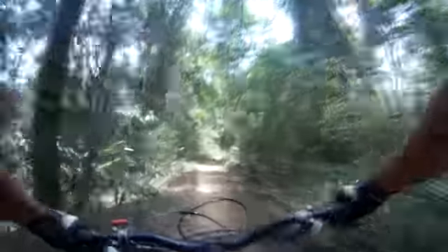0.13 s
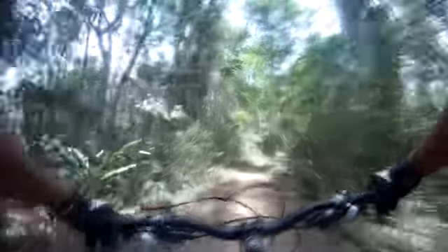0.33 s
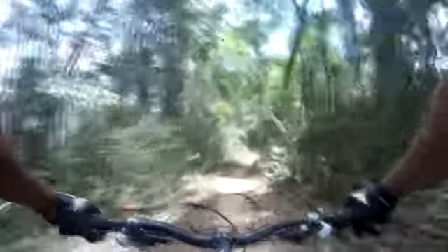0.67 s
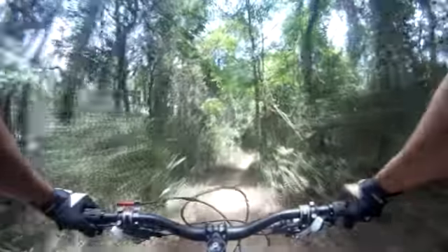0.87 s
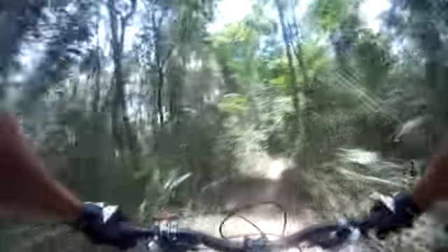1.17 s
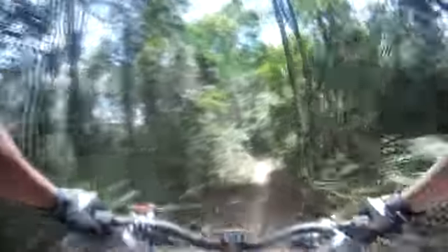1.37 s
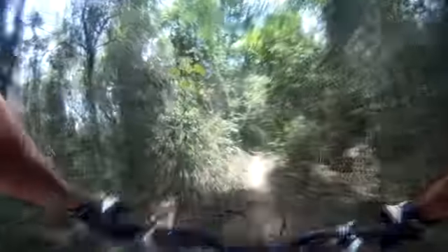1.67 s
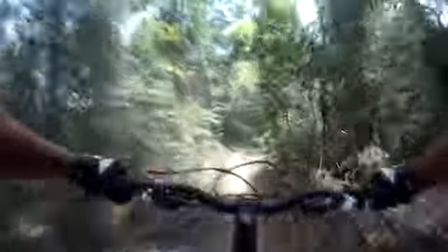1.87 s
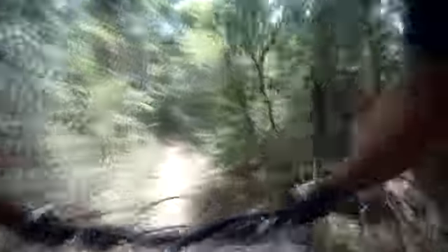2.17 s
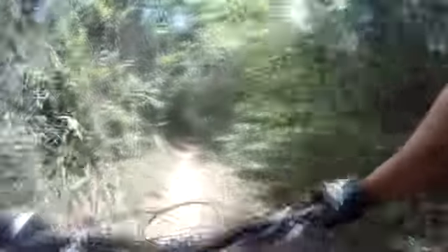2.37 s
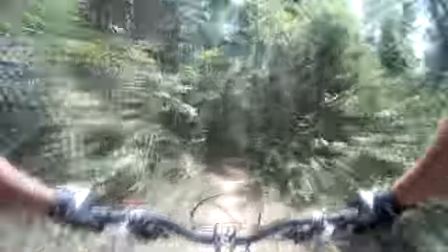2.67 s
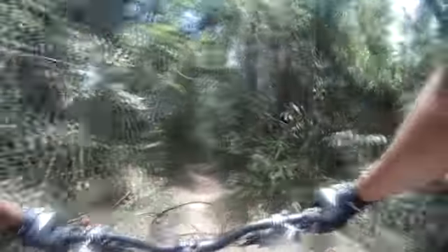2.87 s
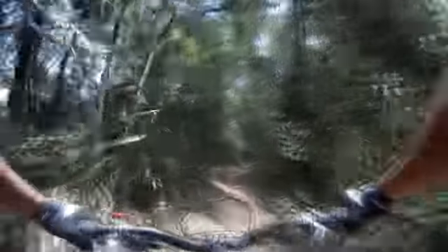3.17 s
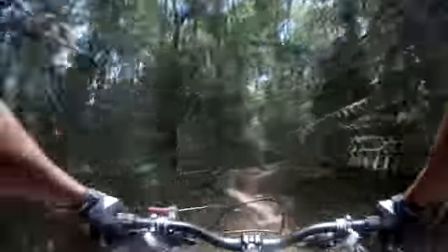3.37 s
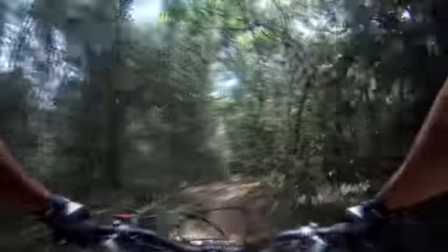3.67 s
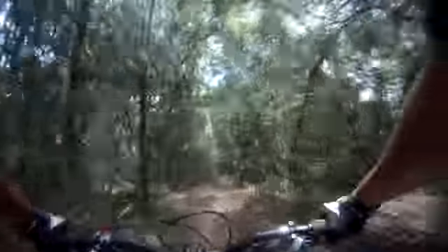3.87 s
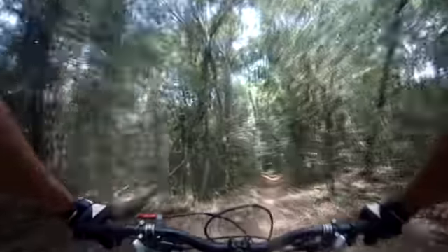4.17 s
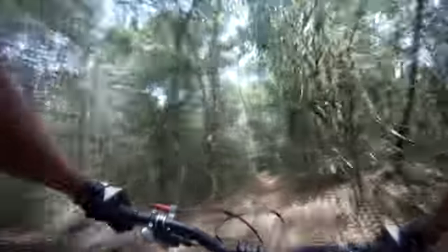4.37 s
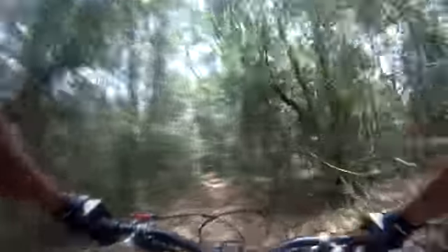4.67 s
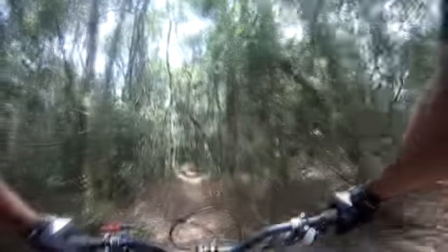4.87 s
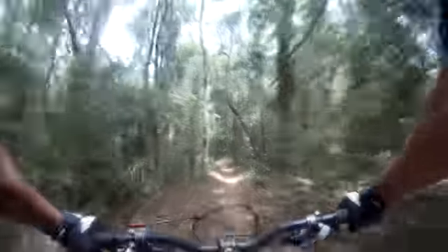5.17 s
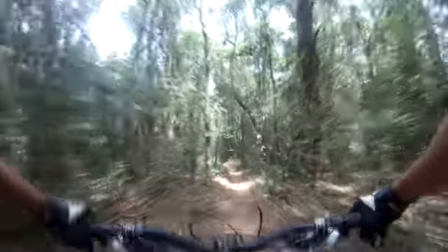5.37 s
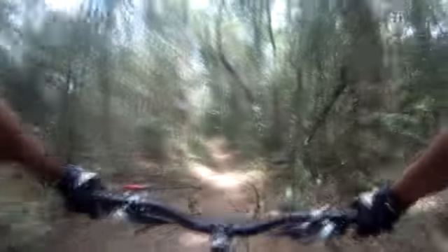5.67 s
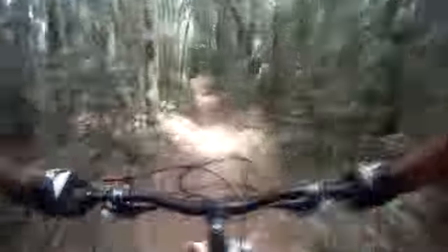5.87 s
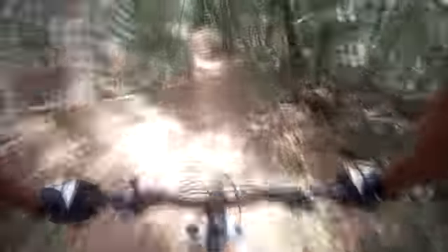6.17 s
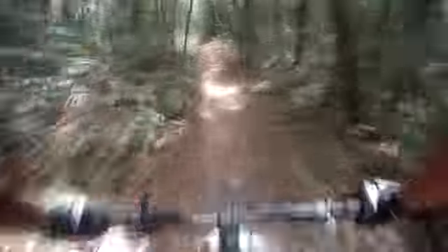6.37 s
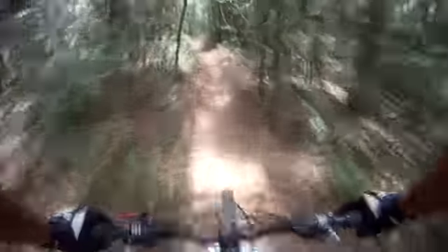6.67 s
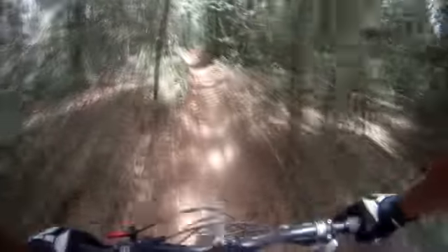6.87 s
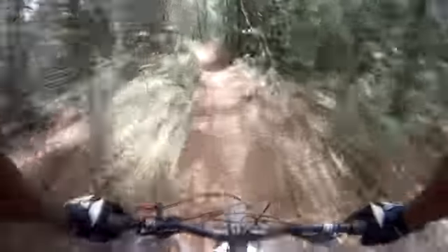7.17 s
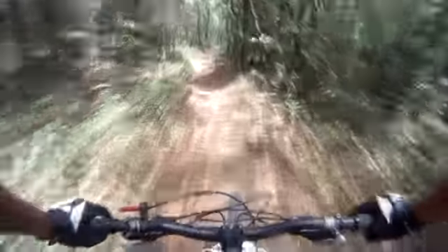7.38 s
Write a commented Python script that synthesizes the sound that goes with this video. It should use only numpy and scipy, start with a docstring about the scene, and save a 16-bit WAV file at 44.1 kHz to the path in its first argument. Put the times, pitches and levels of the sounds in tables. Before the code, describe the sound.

A mountain bike rolls fast along a dirt forest trail, heard close from the rider's camera. The tyres make a quiet crunch and rumble, with a soft low thump about three times a second. The chain and cables rattle in irregular bursts, and several loud, sharp plastic knocks come from the camera case on hard bumps. Near the end the ground gets rougher, with denser rattling and a low thud, before it eases.

```python
"""Tyres crunch and rumble as a mountain bike rolls fast down a dirt trail, heard from the rider's camera.
Friction on dirt and impacts on gravel make the crunch; uneven ground forces the frame to shake.
The chain and cables rattle, a soft thump returns with each wheel turn, and stones are scuffed aside.
Hard bumps ring the modes of the camera's plastic case, and the wheels thud into dips.
The camera's sample-and-hold mirrors the spectrum upward, which adds a glassy top."""
import sys
import numpy as np
from scipy import signal
from scipy.fft import rfft, irfft
from scipy.io import wavfile
from scipy.ndimage import uniform_filter1d

SR = 44100
rng = np.random.default_rng(int(sys.argv[2]) if len(sys.argv) > 2 else 0)


def unload_audio(sound):
    """Save the sound as a 16-bit wav file, at the path given as the first command line argument."""
    columns = np.transpose(np.atleast_2d(sound))
    # keep every value between -1 and 1, then stretch to whole-number steps
    steps = np.round(np.clip(columns, -1, 1) * 32767)
    wavfile.write(sys.argv[1], SR, steps.astype(np.int16))


N = 331632
TIME = np.arange(N) / SR


def undb(db):
    """Decibels to amplitude ratio."""
    return 10 ** (np.asarray(db) / 20)


def unit(x):
    """Normalisation to rms 1."""
    return x / np.sqrt(np.mean(x ** 2))


def peak(x, db):
    """Normalisation to a peak level."""
    return x * undb(db) / np.abs(x).max()


def add(out, start_s, x):
    """Superposition: x joins out from start_s on."""
    i = max(int(start_s * SR), 0)
    out[i:i + len(x)] += x[:N - i]


def curve(rows):
    """Linear interpolation between (time_s, value) rows."""
    return np.interp(TIME, *np.transpose(rows))


def noise_band(size, lo_hz, hi_hz, order=2):
    """Band-limited Gaussian noise."""
    sos = signal.butter(order, [lo_hz, hi_hz], "band", fs=SR, output="sos")
    return signal.sosfilt(sos, rng.standard_normal(size))


def colour(x, spectrum):
    """Spectral shaping by (frequency_hz, level_db) points, with steep skirts outside them; rms 1."""
    hz, db = np.transpose(spectrum)
    f = np.maximum(np.fft.rfftfreq(N, 1 / SR), 1)
    skirts = 1 / np.sqrt((1 + (hz[0] / f) ** 8) * (1 + (f / hz[-1]) ** 8))
    gain = undb(np.interp(np.log(f), np.log(hz), db))
    return unit(irfft(rfft(x) * skirts * gain, N))


def drift(rate_hz):
    """Random modulation: straight glides between chance values; rms 1."""
    hold = int(SR / rate_hz)
    steps = np.repeat(rng.standard_normal(N // hold + 1), hold)
    return unit(uniform_filter1d(steps, hold)[:N])


def grains(per_second, spread_db):
    """Poisson impacts: many small, a few large; rms 1."""
    hits = rng.random(N) < per_second / SR
    signs = rng.choice([-1, 1], N)
    strength_db = spread_db * np.minimum(rng.exponential(size=N), 4)
    return unit(hits * signs * undb(strength_db))


def ring(modes, signs, detune, scatter_db, size=2048):
    """Free vibration: a sum of damped modes, tuned and weighted a little differently at each blow."""
    hz, db, t60_s = np.transpose(modes)[:, :, None]
    shift, weight = rng.standard_normal((2, len(modes), 1))
    t = np.arange(size) / SR
    decay = np.exp(-np.log(1000) * t / t60_s)
    swings = np.sin(2 * np.pi * hz * (1 + detune * shift) * t)
    return signs @ (undb(db - scatter_db * weight) * decay * swings)


# Crunch of the tyres along the trail: time_s, level_db
CRUNCH_LEVEL = [(0.0, -64), (0.9, -62.5), (1.4, -64.5), (2.2, -60.5), (2.41, -57.5), (2.57, -57.5),
                (2.74, -64), (2.91, -64.5), (3.22, -65), (4.86, -63.5), (5.05, -62.5), (5.82, -62.5),
                (6.28, -53), (6.53, -59), (6.83, -61.5), (7.52, -60)]


def rolling_levels():
    """Rolling noise grows with roughness; packed dirt's share grows a quarter as fast on rough ground."""
    crunch_db = curve(CRUNCH_LEVEL) + 2.19
    dirt_db = np.minimum(crunch_db, -61 + .25 * (crunch_db + 61.5))
    return crunch_db, dirt_db


# Spectral density of tyres on dirt: frequency_hz, level_db
DIRT_SPECTRUM = [(150, -31.5), (250, -4.5), (479, -5.5), (755, -6.5), (860, -6), (1060, -3.5), (1150, -5.5),
                 (1520, -7.5), (1650, -8), (2080, -4.5), (2630, -9.5), (2960, -7.5), (3240, -16.5),
                 (3600, -12), (5600, -19), (7280, -58), (12300, -120)]


def dirt_hiss(dirt_db):
    """Friction noise: countless tiny contacts with packed dirt merge into a hiss."""
    hiss = colour(rng.standard_normal(N), DIRT_SPECTRUM)
    return hiss * undb(dirt_db - 0.5 + 0.51 * drift(rate_hz=6.5))


# Spectral density of gravel ringing through frame and case: frequency_hz, level_db
GRAVEL_SPECTRUM = [(320, -47), (550, -17.5), (1060, -2), (1200, -9), (1500, -9.5), (1630, -14),
                   (1760, -7.5), (2060, 0.5), (2340, -7.5), (2550, -11), (3070, -15), (3580, -10),
                   (4180, -26.5), (5330, -30), (5600, -30.5), (7280, -63.5), (12300, -120)]


def gravel_crunch(crunch_db, dirt_db, scuffs):
    """Shot noise of loose stones: it takes the rolling power that dirt leaves, plus that of the scuffs."""
    loose = np.sqrt(np.maximum(undb(crunch_db) ** 2 - 0.98 * undb(dirt_db) ** 2, 0))
    flutter_db = 1.8 * drift(rate_hz=60)
    stones = grains(per_second=810, spread_db=3.5) + 0.69 * rng.standard_normal(N)
    return colour(stones, GRAVEL_SPECTRUM) * np.hypot(loose, scuffs) * undb(flutter_db - 0.47)


# Modes of the struck chain: pitch_hz, level_db, t60_s
CHAIN_MODES = [(2010, -10.5, 0.0097), (2723, -4, .008), (3020, 0.5, 0.0025), (3530, 0.5, .008),
               (4450, -10, 0.0065), (5060, -3, 0.0027)]


def chain_ring():
    """Impulse response of the chain: neighbouring modes start in antiphase."""
    signs = (-1) ** np.arange(len(CHAIN_MODES))
    return ring(CHAIN_MODES, signs, detune=0.034, scatter_db=3.0)


def chain_chatter(crunch_db, scuffs):
    """Random excitation: small contacts ring the chain, harder on rough ground and in scuffs."""
    contacts = grains(per_second=150, spread_db=5.5)
    chatter = unit(signal.fftconvolve(contacts, chain_ring())[:N])
    return chatter * np.hypot(undb(crunch_db), scuffs) * undb(-12.0)


# Spectral density of the frame's rumble: frequency_hz, level_db
RUMBLE_SPECTRUM = [(7.1, -29.5), (12, 2.5), (28, -2), (48, -15), (86, -14), (187, -23), (281, -29.5),
                   (318, -31), (500, -38), (650, -67), (1100, -120)]
# Shaking of the frame along the trail: time_s, level_db
SHAKE_LEVEL = [(0.0, -59), (0.31, -55.5), (0.57, -51.5), (1.42, -59), (1.78, -54.5), (1.97, -49.5),
               (2.34, -50), (3.18, -57), (3.44, -57), (4.0, -54.5), (4.79, -58), (5.03, -49.5), (5.55, -55),
               (6.22, -47), (6.87, -55), (7.52, -50.5)]


def frame_rumble():
    """Forced vibration: uneven ground shakes the frame at low frequencies."""
    rumble = colour(rng.standard_normal(N), RUMBLE_SPECTRUM)
    return rumble * undb(curve(SHAKE_LEVEL) + 6.02 + 1.7 * drift(rate_hz=16))


# Slaps of chain and cables: start_s, level_db, body_relative_db
CHAIN_SLAPS = [(0.051, -37, -28), (0.4562, -32.5, -18), (0.59, -44.5, -14), (1.201, -37.5, -26),
               (1.2093, -37, -32), (1.5297, -40.5, -18), (1.583, -49, -9), (2.262, -25.5, -8.5),
               (2.342, -40, -11), (2.397, -40, -29), (2.525, -25.5, -27), (2.598, -27.5, -33),
               (2.7, -29.5, -28), (3.003, -48, -15), (3.719, -33, -13), (4.36, -36, -23),
               (4.505, -45.5, -18.5), (4.8752, -42, -23), (4.89, -25.5, -29.5), (5.064, -39, -25),
               (5.112, -32, -18), (5.171, -30, -19), (5.789, -24, -17.5), (5.897, -27.5, -20.5),
               (5.976, -23, -39), (6.085, -23, -32), (6.169, -29.5, -14), (6.26, -26, -9),
               (6.315, -24, -33), (7.009, -36.5, -15)]


def chain_slaps(rebounds=3, rebound_db=-5.5, loss_db=3.8):
    """Inelastic impact: the chain grazes, lands and rebounds ever more weakly; the frame answers dully."""
    out, t = np.zeros(N), np.arange(4096) / SR
    lead_s = .012
    for start_s, level_db, body_db in CHAIN_SLAPS:
        friction = rng.standard_normal(len(t)) / np.cosh((t - lead_s) / 0.0031)
        graze = signal.fftconvolve(friction, chain_ring())
        add(out, start_s + 0.001484 - lead_s, peak(graze, level_db - 11.5))
        add(out, start_s, peak(chain_ring(), level_db - 0.6))
        lags_s = np.cumsum(rng.uniform(.0008, .0032, rebounds))
        for k, lag_s in enumerate(lags_s):
            add(out, start_s + lag_s, peak(chain_ring(), level_db + rebound_db - loss_db * k))
        body = noise_band(len(t), 590, 2400) * np.exp(-t / 0.016)
        add(out, start_s, peak(body, level_db + body_db + 2.0))
    return out


def tyre_thuds(rows, roughness, gain_db, delay_s=0, swell_s=0.0099, size=8192):
    """Elastic compression: the squeezed tyre swings briefly over a slower sway of the fork."""
    out, t = np.zeros(N), (np.arange(size) - size / 2) / SR
    sway_hz, sway_db = 32, -1.5
    for centre_s, level_db, pitch_hz in rows:
        phase = 2 * np.pi * rng.random()
        swing = np.cos(2 * np.pi * pitch_hz * t + phase)
        sway = undb(sway_db) * np.cos(2 * np.pi * sway_hz * t + phase)
        scrub = unit(noise_band(size, 22, 116.4, order=5))
        thud = (swing + sway + roughness * scrub) / np.cosh(t / swell_s)
        add(out, centre_s + delay_s + t[0], peak(thud, level_db + gain_db))
    return out


# Strength of the wheel's thump along the trail: time_s, level_db
THUMP_LEVEL = [(0.1, -30), (1.46, -33), (1.8, -38.5), (2.8, -28.5), (3.5, -33), (4.85, -31), (5.9, -36.5),
               (6.85, -35), (7.2, -30.5)]


def wheel_thumps(turns=22, first_s=.094, period_s=.3417, shortening_s=.00029):
    """Periodic forcing: one soft thump a turn, about three a second, as the wheel slowly gains speed."""
    turn = np.arange(turns)
    centre_s = first_s + period_s * turn - shortening_s * turn ** 2 / 2
    level_scatter, pitch_scatter = rng.standard_normal((turns, 2)).T
    level_db = np.interp(centre_s, *np.transpose(THUMP_LEVEL)) + 0.95 * level_scatter
    pitch_hz = 69 + 6 * pitch_scatter
    return tyre_thuds(zip(centre_s, level_db, pitch_hz), roughness=0.77, gain_db=0.5)


# The tyre scuffing loose stones: centre_s, level_db, half_length_s
STONE_SCUFFS = [(0.47, -56.5, 0.022), (0.777, -51.5, 0.0048), (1.017, -55.5, .01), (1.594, -56.5, .045),
                (1.916, -55.5, 0.065), (2.006, -50, 0.017), (2.216, -52.5, 0.019), (2.485, -46.5, 0.064),
                (2.665, -49.5, 0.024), (3.927, -59, .012), (4.034, -54, 0.0087), (5.303, -58.5, .018),
                (5.793, -53, 0.038), (6.003, -48.5, 0.013), (6.099, -47, 0.021), (6.302, -47.5, 0.14),
                (6.429, -45, 0.028), (6.81, -55.5, 0.037), (7.25, -50, 0.0092), (7.385, -54.5, 0.043)]


def scuff_envelope():
    """Amplitude modulation: each scuff is a Gaussian swell in the gravel and the chain's chatter."""
    return sum(undb(level_db) * np.exp(-((TIME - centre_s) / half_length_s) ** 2)
               for centre_s, level_db, half_length_s in STONE_SCUFFS)


# Modes of the plastic camera case: pitch_hz, level_db, t60_s
CASE_MODES = [(716, -36.5, .025), (904, -25.5, 0.017), (1065, -16.5, 0.02), (1910, 2, 0.0083),
              (2122.5, -2, 0.019), (2230, -9, 0.0065), (3557, -14.5, 0.0095), (4596, -27.5, 0.011)]
# Knocks of the case on its mount: start_s, level_db, clunk_relative_db
CASE_KNOCKS = [(0.65, -1, -24.5), (1.856, -16.5, -7), (2.315, -23, -10.5), (2.769, -1.5, -23.5),
               (4.898, -2, -22), (5.163, -8, -15.5), (5.385, -2, -27), (6.364, -1, -31.5)]


def case_knocks():
    """Modal interference: the struck case's upper modes start against the lower, so its ring swells."""
    out, t = np.zeros(N), np.arange(2048) / SR
    signs = np.where(np.arange(len(CASE_MODES)) < len(CASE_MODES) / 2, 1, -1)
    contact = 1 - np.exp(-t / 0.00036)
    for start_s, level_db, clunk_db in CASE_KNOCKS:
        case = ring(CASE_MODES, signs, detune=.003, scatter_db=.3) * contact
        mount_clunk = noise_band(len(t), 83, 1200) * np.exp(-t / 0.0057) * contact
        crack = noise_band(len(t), 3100, 5300) * np.exp(-t / 0.0021) * contact
        crack_db = 2.9 * level_db - 14.0  # the bright crack grows faster than the blow
        knock = peak(case, level_db + 3.0) + peak(mount_clunk, level_db + clunk_db)
        add(out, start_s + .001, knock + peak(crack, crack_db))
    return out


# Dips in the trail: time_s, level_db, pitch_hz
TRAIL_DIPS = [(2.264, -40.5, 165), (2.558, -31, 51), (6.11, -32.5, 51), (6.232, -26, 173.5),
              (6.259, -19, 58), (6.461, -38.5, 105)]


def dip_thuds():
    """Transient loading: a wheel drops into a dip and its tyre gives a low thud."""
    return tyre_thuds(TRAIL_DIPS, roughness=0.78, gain_db=1.5, delay_s=.009)


def scene():
    """Superposition of direct sound: all parts of the moving bike, close and without echo."""
    thuds = wheel_thumps() + dip_thuds()
    crunch_db, dirt_db = rolling_levels()
    scuffs = scuff_envelope()
    tyres = dirt_hiss(dirt_db) + gravel_crunch(crunch_db, dirt_db, scuffs)
    rattle = chain_chatter(crunch_db, scuffs) + frame_rumble() + chain_slaps()
    return (tyres + rattle + thuds + case_knocks())[None]


def record(dry, band_hz=5650, hold_hz=12000, top_hz=15200):
    """Spectral imaging: holding samples mirrors the band-limited, soft-clipped sound about hold_hz."""
    narrow = signal.sosfilt(signal.butter(12, band_hz, fs=SR, output="sos"), dry)
    clipped = narrow / (1 + (narrow / .97) ** 8) ** (1 / 8)  # flattens the loudest knocks
    mirrored = clipped * (1 + 2 * np.cos(2 * np.pi * hold_hz * TIME))
    f = np.fft.rfftfreq(N, 1 / SR)
    hold_droop = np.sinc(f / hold_hz)
    treble_lift = undb(1.3 * f / hold_hz)
    held = irfft(rfft(mirrored) * hold_droop * treble_lift, N)
    return signal.sosfiltfilt(signal.ellip(8, .1, 50, top_hz, fs=SR, output="sos"), held)


dry = scene()
out = record(dry)
unload_audio(out)
```